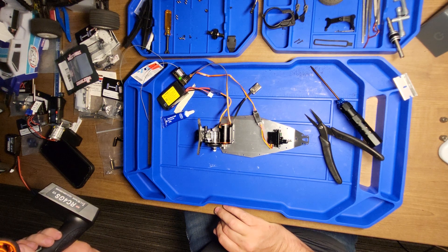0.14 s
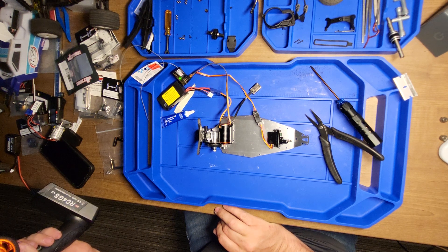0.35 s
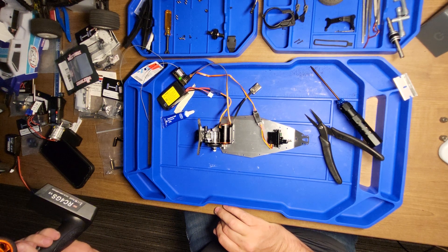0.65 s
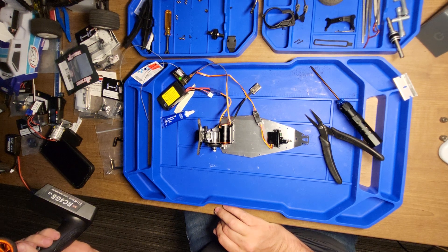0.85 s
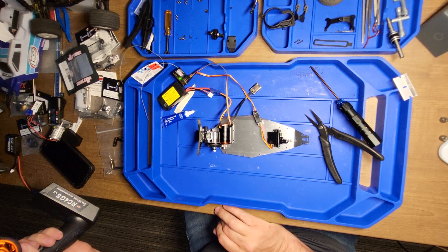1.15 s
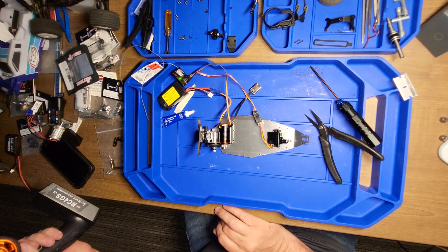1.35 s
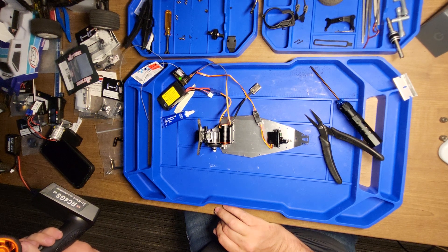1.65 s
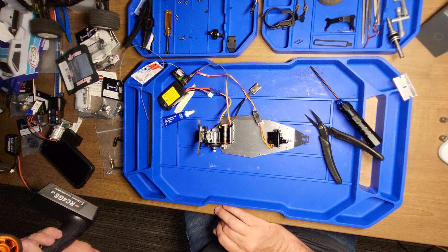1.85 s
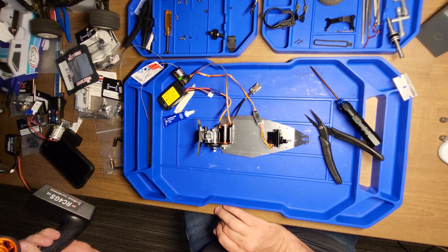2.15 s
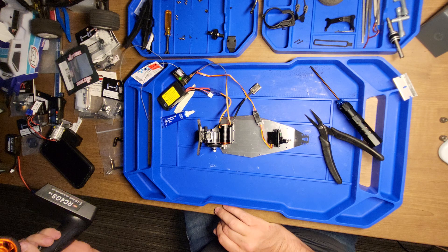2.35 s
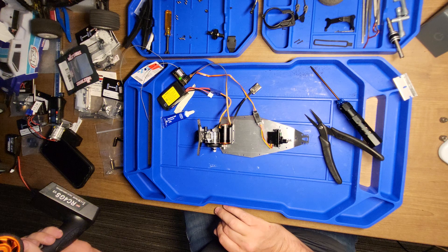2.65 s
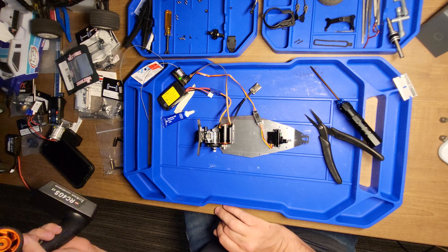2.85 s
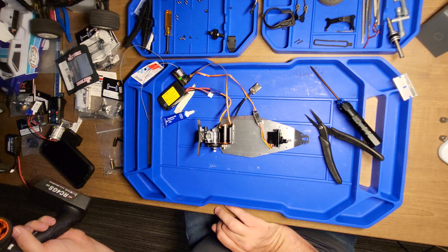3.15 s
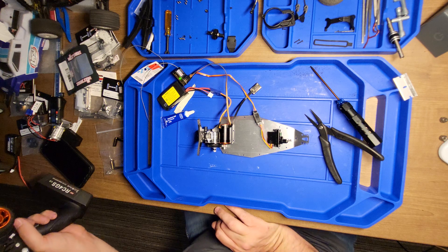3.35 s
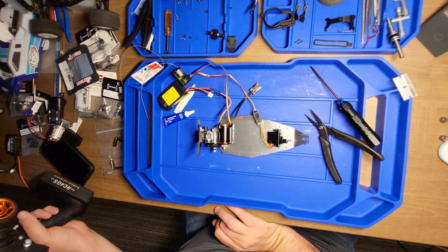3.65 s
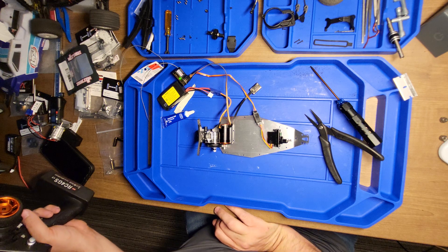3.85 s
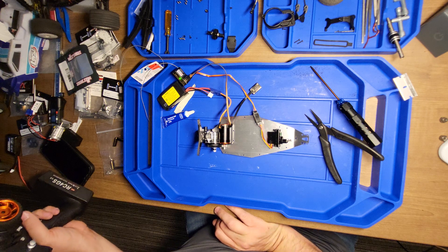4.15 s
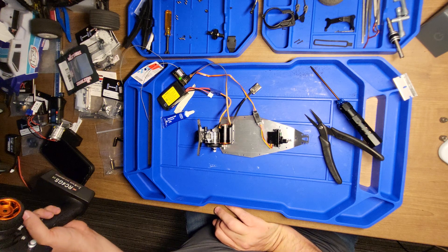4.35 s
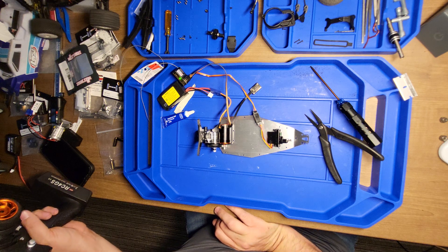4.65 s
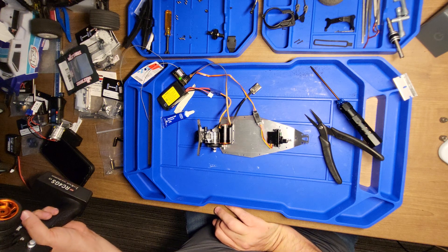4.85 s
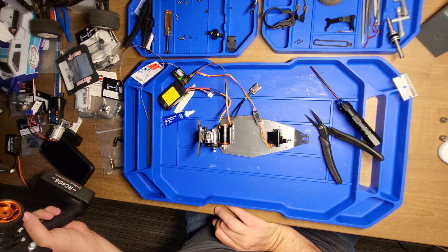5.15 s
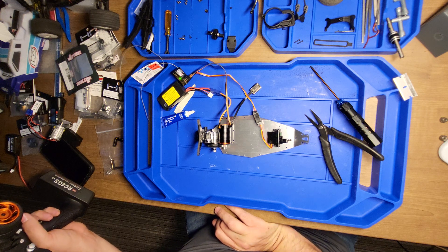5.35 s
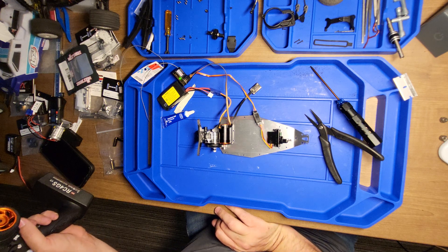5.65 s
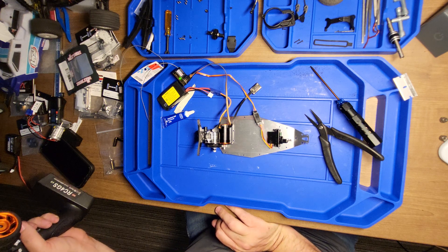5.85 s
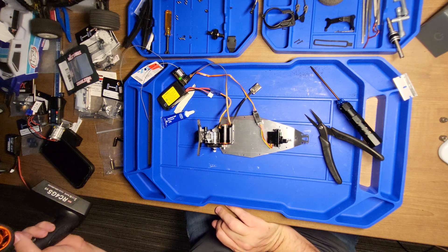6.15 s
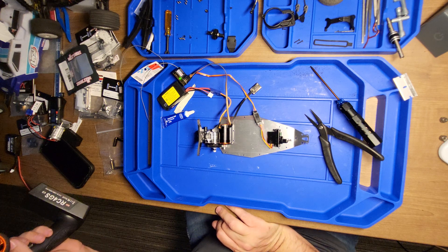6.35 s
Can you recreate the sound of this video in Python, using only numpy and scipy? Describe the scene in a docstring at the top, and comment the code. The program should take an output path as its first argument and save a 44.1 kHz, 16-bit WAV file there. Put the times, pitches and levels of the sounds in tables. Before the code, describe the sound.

A small model-car motor revs in short, rattling, whining gear bursts, each coasting down to silence in a quiet room with a faint wavering hum.

```python
"""Bursts of ticking, rattling and whining gears, heard in a quiet, small room: a small brushless motor on a model
car chassis, lying on a plastic tray, is revved below a phone with two microphone ports.
Pinion teeth strike and scrape the spur gear and ring the chassis; mesh and magnets whine with speed, sliding
teeth hiss, and brief scrapes stand out, some of them as knocks. The controller sings when it starts the rotor.
Behind it all a low hum wavers."""
import sys
import numpy as np
from scipy import signal
from scipy.fft import rfft, irfft, next_fast_len
from scipy.io import wavfile
from scipy.ndimage import uniform_filter1d

SR = 44100
rng = np.random.default_rng(int(sys.argv[2]) if len(sys.argv) > 2 else 0)


def master(y):
    """Save y as 16-bit WAV."""
    cut = np.clip(np.atleast_2d(y).T, -1, 1)
    pcm = np.round(cut * 32767)  # scale
    wavfile.write(sys.argv[1], SR, pcm.astype(np.int16))


N = 286209
T = np.arange(N) / SR  # seconds


def undb(db):
    """Decibels to amplitude."""
    return 10 ** (np.asarray(db) / 20)


def unit(x):
    """Scale to rms 1."""
    return x / np.sqrt(np.mean(x ** 2))


def over_hz(table, size):
    """A (Hz, value) table read at every bin of a transform, along log frequency."""
    hz, value = np.transpose(table)
    bins = np.fft.rfftfreq(size, 1 / SR)
    return np.interp(np.log(bins + 1), np.log(hz + 1), value)


def noise(spectrum):
    """Noise with the given colour, rms 1."""
    size = N + N % 2
    white = rfft(rng.standard_normal(size))
    return unit(irfft(white * undb(over_hz(spectrum, size)))[:N])


def walk(rate):
    """Random levels held 1 / rate s and slewed twice; rms 1."""
    hold = int(SR / rate)
    steps = np.repeat(rng.standard_normal(N // hold + 1), hold)
    return unit(uniform_filter1d(uniform_filter1d(steps, hold), hold)[:N])


# Colour of the hiss of sliding teeth. Each row: frequency in Hz, relative level in dB per Hz.
SLIDING_COLOUR = [(2000, -41.5), (3400, -12), (3840, -1), (4770, -10.5), (5520, -6), (7030, -6.5),
                  (7840, -9), (9800, -5.5), (10900, -3), (13100, -1.5), (15600, -12.5)]


def gears():
    """Ticks and scrapes ring the chassis, the whine sounds beside them; sliding teeth add a hiss. Returns the
    car's sound, and each port's own hiss."""
    mesh, load, pull = motor()
    count_up = np.cumsum(mesh) / SR  # teeth passed so far
    ticks, scrape = teeth(count_up)
    # ticks and scrapes sound at every speed, single ticks a little stronger when slow;
    # overlapping scrapes merge into a steady rub
    tick_part = unit(ticks) * (mesh.max() / mesh) ** .2 * .6
    scrape_part = unit(scrape / (np.sqrt(mesh) + mesh / 14))
    strike = tick_part + scrape_part
    # slow contacts are softer and duller
    dull = signal.lfilter([.35], [1, -.65], strike)
    strike = dull + (strike - dull) * (mesh / mesh.max()) ** .45
    level, hiss = loudness(mesh, load, pull)
    ring = 0.76 * unit(chassis(strike * undb(2.0 * walk(70))))
    shared = noise(SLIDING_COLOUR)
    own = np.array([noise(SLIDING_COLOUR), noise(SLIDING_COLOUR)])
    flicker = hiss * undb(-4.0 + 1.0 * walk(120))
    car = level * (ring + whine(mesh, load, count_up)) + flicker * shared
    return car, 1.74 * flicker * own


# Trigger pulls. Each row: trigger on in seconds, off in seconds, spin-up time in seconds, full mesh rate in Hz
# at release, coasting time in seconds, ring level in dB and hiss level in dB before speed and load act.
PULLS = [(-.6, -0.129, 0.24, 3244, .36, -10.5, -11.5), (0.582, 1.09, 0.25, 3229, 0.33, -17, -18.5),
         (1.82, 2.481, 0.28, 3238, 0.38, -19.5, -19.5), (3.749, 3.952, 0.23, 3250, .45, -17, -15),
         (4.117, 4.237, .24, 3243, .4, -16.5, -16.5), (4.548, 5.067, .187, 3263, .41, -19, -20)]
AIM_HZ, FRICTION_HZ = 4400, 500  # spin-up heads above full rate, coasting heads this far below zero
CRAWL_HZ = 70  # lowest mesh rate
KNEE, CREEP_HZ_PER_S = 40, 110  # sharpness of the speed limit, its slow rise
TRIGGER_S = .02  # trigger travel


def motor():
    """Exponential spin-up to a speed limit, then coasting: tooth mesh rate in Hz, load (0-1) and pull number."""
    mesh, load, pull = np.zeros(N), np.zeros(N), np.zeros(N, int)
    start = 0
    for k, (on, off, rise, full_hz, coast, _, _) in enumerate(PULLS):
        def free(s):
            return AIM_HZ - (AIM_HZ - start) * np.exp(-(s - on) / rise) + 1

        def limited(s):
            limit = full_hz - CREEP_HZ_PER_S * (off - s)
            return (free(s) ** -KNEE + limit ** -KNEE) ** (-1 / KNEE)

        released = limited(off)

        def slowing(s):
            return np.maximum((released + FRICTION_HZ) * np.exp(-(s - off) / coast) - FRICTION_HZ, 0)

        next_on = PULLS[k + 1][0] if k + 1 < len(PULLS) else T[-1] + 1
        now = (T >= on) & (T < next_on)
        held = T[now] < off
        pulled = np.minimum(T[now], off)
        mesh[now] = np.where(held, limited(pulled), slowing(T[now]))
        load[now] = held * (limited(pulled) / free(pulled)) ** KNEE
        pull[now] = k
        start = slowing(next_on)
    travel = int(TRIGGER_S * SR)
    mesh = np.maximum(uniform_filter1d(mesh, size=travel), CRAWL_HZ)
    return mesh, uniform_filter1d(load, size=travel), pull


PINION_TEETH, SPUR_TEETH = 13, 63


def teeth(count_up):
    """A tick and a soft scrape per tooth; each spur tooth keeps its own size every turn, loose teeth rattle by chance."""
    tooth = np.arange(1, int(count_up[-1]))
    place = np.interp(tooth, count_up, np.arange(N)).astype(int)
    own = rng.standard_normal(SPUR_TEETH)[tooth % SPUR_TEETH]
    chance = rng.standard_normal(len(tooth)) * undb(2.2 * rng.exponential(size=len(tooth)))
    wobble = 1 + 0.11 * np.sin(2 * np.pi * tooth / SPUR_TEETH)  # the spur runs off centre
    ticks, contact = np.zeros(N), np.zeros(N)
    ticks[place] = wobble * (1.5 * own + chance)
    # play makes the teeth meet unevenly
    slack = np.clip(.2 * rng.standard_normal(len(tooth)), -.45, .45)
    meeting = np.interp(tooth + slack, count_up, np.arange(N)).astype(int)
    contact[meeting] = wobble * undb(2.5 * rng.standard_normal(len(tooth)))
    # each contact swells and fades over a few ms
    pole = np.exp(-1 / (.0015 * SR))
    envelope = signal.lfilter([1], [1, -2 * pole, pole ** 2], contact)
    return ticks, envelope * rng.standard_normal(N)


# Modes of chassis and tray. Each row: frequency in Hz, width in Hz of a single pass, peak level in dB.
CHASSIS_MODES = [(257, 140, -31), (388.2, 58, -20), (649.8, 130, -17), (728, 75, -18), (940, 190, -20.5),
                 (1264, 33, -31), (1580, 147, 0), (1648.7, 121, 1), (2612, 240, -6), (3375, 83, -15),
                 (3840, 290, -4), (4280, 860, -5.5), (4970, 550, -4.5), (5430, 260, 2), (6500, 510, -4),
                 (6893, 110, -3), (8370, 680, -3), (9100, 580, -25), (10050, 262, 5.5), (11500, 620, -15),
                 (12330, 480, -8), (13390, 530, -10.5), (14200, 550, -9.5)]


def chassis(x):
    """The modes of chassis and tray, each applied twice for steep flanks."""
    out = 0
    for hz, width, db in CHASSIS_MODES:
        b, a = signal.iirpeak(hz, hz / width, SR)
        out = out + undb(db) * signal.lfilter(np.convolve(b, b), np.convolve(a, a), x)
    return out


# The whines, one entry each: cycles per motor turn; strength in dB at full speed before radiation and load;
# loss in dB per halving of speed; change in dB while the teeth are under load.
ORDERS_OF_TURN = [3, 6, 13, 26, 39, 52]
WHINE_DB = [-1, 1, 1, 6, 0, 2]
SLOW_FADE_DB = [7, 14, 3, 10, 5, 6]
LOADED_DB = [-2, 0, -1, -5, -2, 0]
# How well the car radiates a whine of each pitch. Each row: pitch in Hz, relative level in dB.
RADIATION = [(380, -25), (480, -37), (580, -22), (700, -16), (760, -21), (1050, -36), (1200, -16),
             (1500, -24), (2150, -34), (2450, -14), (2700, -7.5), (2950, -15), (3200, -20), (3600, -27),
             (4300, -6), (4800, -21), (5500, -14), (6000, -17), (6480, -11), (8000, -21), (10000, -13),
             (11300, -15), (13000, -10.5)]
MESH_LOW_HZ = 2200  # the small gears radiate mesh tones ever more weakly below this
# a sharp resonance that the third mesh harmonic meets at full speed
SING_HZ, SING_WIDTH_HZ, SING_DB = 9730, 47, 19.5


def whine(mesh, load, count_up):
    """Clean tones locked to the motor turn, fading as it slows."""
    octaves = np.log2(mesh / mesh.max())
    hz, radiated = np.transpose(RADIATION)
    out = 0
    for cycles, db, fade, loaded in zip(ORDERS_OF_TURN, WHINE_DB, SLOW_FADE_DB, LOADED_DB):
        pitch = cycles * mesh / PINION_TEETH
        db = db + loaded * load + fade * octaves
        db = db + np.interp(pitch, hz, radiated, left=-60) + 1.5 * walk(25)
        if cycles >= PINION_TEETH:
            db = db - 40 * np.clip(1 - pitch / MESH_LOW_HZ, 0, 1)
        if cycles == 3 * PINION_TEETH:
            detuned = (pitch - SING_HZ) / SING_WIDTH_HZ
            db = db + np.maximum(SING_DB - 20 * np.log10(1 + detuned ** 2), 0)
        phase = 2 * np.pi * cycles * count_up / PINION_TEETH + .3 * walk(60)
        out = out + undb(db) * np.sin(phase)
    return np.sqrt(2) * out


# The gears cog along slowly, then stand until the next pull.
# Each row: start in seconds, stop in seconds, added ring level in dB.
CRAWLS = [(0.449, 0.543, -41), (1.769, 1.824, -37), (3.22, 3.349, -43), (5.778, 5.917, -49.5)]
RING_DB_PER_OCTAVE, HISS_DB_PER_OCTAVE = 7.5, 11.5  # growth with speed, off load
# teeth under load ring louder; ring and hiss then lose these shares less at low speed
PUSH_DB, PUSH_RELIEF, HISS_RELIEF = 3, 0.64, 0.34
RATTLE_DB = -41.5  # loose teeth rattle at any speed


def loudness(mesh, load, pull):
    """Ring and hiss grow with speed and load; both cease while the gears stand."""
    octaves = np.log2(mesh / mesh.max())
    ring_db, hiss_db = np.transpose(PULLS)[5:, pull]
    ring_db = ring_db + PUSH_DB * load + RING_DB_PER_OCTAVE * octaves * (1 - PUSH_RELIEF * load)
    level = undb(ring_db) + undb(RATTLE_DB)
    hiss = undb(hiss_db + HISS_DB_PER_OCTAVE * octaves * (1 - HISS_RELIEF * load))
    turning = np.ones(N)
    for start, stop, db in CRAWLS:
        level = level + undb(db) * ((T > start) & (T < stop))
        next_on = min([on for on, *_ in PULLS if on > start] + [T[-1] + 1])
        turning[(T >= stop) & (T < next_on)] = 0
    return uniform_filter1d(np.array([level, hiss]) * turning, size=200)


# Brief bursts of scraping: some are knocks, some just the louder chance moments of the running gears.
# Each row: start in seconds, level in dB before the chassis.
SCRAPE_BURSTS = [(0.5944, -11), (0.8495, -17), (1.7314, -40), (1.7679, -22), (1.8306, -15.5),
                 (2.0856, -10.5), (3.2126, -35.5), (3.2879, -26.5), (3.3075, -29), (3.7647, -5),
                 (3.7794, -18.5), (3.8082, -19.5), (3.9215, -15), (3.9489, -3.5), (4.0146, 0.5),
                 (4.2295, -11.5), (5.5466, -18), (5.858, -25.5), (5.879, -30), (5.8959, -32.5),
                 (5.9514, -50.5), (6.243, -46)]


def scrape_bursts():
    """Each burst is a few ms of fading noise into the chassis."""
    x, length = np.zeros(N), int(0.013 * SR)
    fade = np.exp(-np.arange(length) / (0.0033 * SR))
    for (s, db), burst in zip(SCRAPE_BURSTS, rng.standard_normal((len(SCRAPE_BURSTS), length))):
        i = int(s * SR)
        x[i:i + length] += undb(db) * burst * fade
    return 1.1 * chassis(x) + 0.1 * x


# The controller pushes a slow rotor. Each row: start in seconds, end in seconds, level in dB before the throb.
STARTS = [(.455, .475, -50), (.584, .63, -38), (1.77, 1.83, -52), (3.748, 3.795, -35), (5.78, 5.83, -48)]
# Its switching tones. Each row: frequency in Hz, relative level in dB.
SWITCHING_TONES = [(4020, -2), (8040, -12), (12060, 3)]


def controller():
    """Switching tones that throb with each step of the rotor, 95 a second."""
    gate = 0
    for start, end, db in STARTS:
        throb = 1 + .5 * np.cos(2 * np.pi * 95 * (T - start - .004))
        gate = gate + undb(db) * ((T > start) & (T < end)) * throb
    tones = 0
    for hz, db in SWITCHING_TONES:
        tones = tones + undb(db) * np.sin(2 * np.pi * hz * T + 0.43 * walk(300))
    return uniform_filter1d(gate, size=90) * tones


# Balance of the two microphone ports. Each row: frequency in Hz, left minus right in dB.
LEFT_DB = [(60, 3), (110, -3), (200, -2.5), (380, -4.5), (700, 1.5), (1290, -8), (2380, 4.5), (4400, -3.5),
           (8120, -2), (15000, 10)]
# Phase between the ports. Each row: frequency in Hz, lead of the left in radians.
LEFT_LEAD = [(0, 0), (2500, -1.3), (2840, .6), (3790, -4.5), (5770, -5.7), (6980, -1.5), (8100, -3.3),
             (9040, -1.2), (9470, 2.3), (11800, 2.9), (12900, 7.4), (13700, 4.7), (14100, 8.2), (15300, 10)]


def ports(x):
    """The two microphone ports hear each band with their own level and lag."""
    size = next_fast_len(N + 2048)
    lead = np.interp(np.fft.rfftfreq(size, 1 / SR), *np.transpose(LEFT_LEAD))
    # each port takes half of the difference
    half = undb(over_hz(LEFT_DB, size) / 2) * np.exp(.5j * lead)
    return np.array([irfft(rfft(x, size) * h, size)[:N] for h in (half, 1 / half)])


ROOM_T60_S, ROOM_TREBLE_T60_S, ROOM_DB = .5, .2, -10


def room(x):
    """A diffuse tail, unrelated left and right, duller as it fades."""
    t = np.arange(int(.8 * SR)) / SR
    white = rng.standard_normal((2, len(t)))
    dull = signal.lfilter([.3], [1, -.7], white)
    low_tail = dull * np.exp(-np.log(1000) * t / ROOM_T60_S)
    treble_tail = (white - dull) * np.exp(-np.log(1000) * t / ROOM_TREBLE_T60_S)
    tail = (low_tail + treble_tail) * np.minimum(t / 0.0025, 1)
    tail = tail / np.sqrt(np.sum(tail ** 2) / 2)
    return undb(ROOM_DB) * signal.fftconvolve(x[None], tail, axes=1)[:, :N]


# Course of the hum. Each row: time in seconds, level in dB before the brief dips.
HUM = [(0.0, -40.5), (0.43, -54.5), (2.46, -52), (2.56, -65.5), (2.71, -47), (2.95, -68), (2.98, -56.5),
       (3.33, -47), (3.42, -80), (3.56, -52), (3.7, -73), (3.78, -48), (4.95, -53.5), (5.01, -65),
       (5.35, -45), (5.69, -55), (6.42, -53), (6.49, -51.5)]
HUM_HZ, HUM_DRIFT_HZ = 118, 1.9
HUM_DIP_DB = 6.5  # depth scale: the hum keeps dropping out briefly
# Steady-pitched low tones. Each row: frequency in Hz, middle level in dB.
LOW_TONES = [(58.6, -65), (70, -72.5), (178, -74)]
# Colour of the faint hiss. Each row: frequency in Hz, relative level in dB per Hz.
QUIET_COLOUR = [(15, -44.5), (25, -21.5), (119, -9.5), (144, -4), (169, -20), (314, -22), (1000, -53.5),
                (1580, -49.5), (2070, -57), (5460, -50.5), (8180, -52), (11300, -43.5), (15600, -49.5)]
QUIET_DB = -60


def background():
    """A wavering hum, a few low tones and a faint flickering hiss."""
    phase = 2 * np.pi * np.cumsum(HUM_HZ + HUM_DRIFT_HZ * walk(4.7)) / SR
    hum_db = np.interp(T, *np.transpose(HUM)) + HUM_DIP_DB * (0.86 - walk(12) ** 2)
    hum = np.sqrt(2) * undb(hum_db) * np.sin(phase)
    tones = 0
    for hz, db in LOW_TONES:
        tones = tones + np.sqrt(2) * undb(db + 4.0 * walk(18)) * np.sin(2 * np.pi * hz * T)
    mid, side = noise(QUIET_COLOUR), noise(QUIET_COLOUR)
    stereo = mid + .5 * side * np.array([[1], [-1]])
    return hum + tones + undb(QUIET_DB + 2.0 * walk(6)) * stereo


def scene():
    """The car straight and by way of the room, over the background."""
    ring, hiss = gears()
    car = ring + scrape_bursts() + controller()
    return ports(car) + hiss + room(car) + background()


TOP_HZ = 15740


def record(dry):
    """The phone rounds the loudest peaks and cuts the top."""
    rounded = .9 * np.tanh(dry / .9)
    top_cut = signal.ellip(12, .2, 90, TOP_HZ, fs=SR, output="sos")
    return signal.sosfilt(top_cut, rounded)


dry = scene()
out = record(dry)
master(out)
```